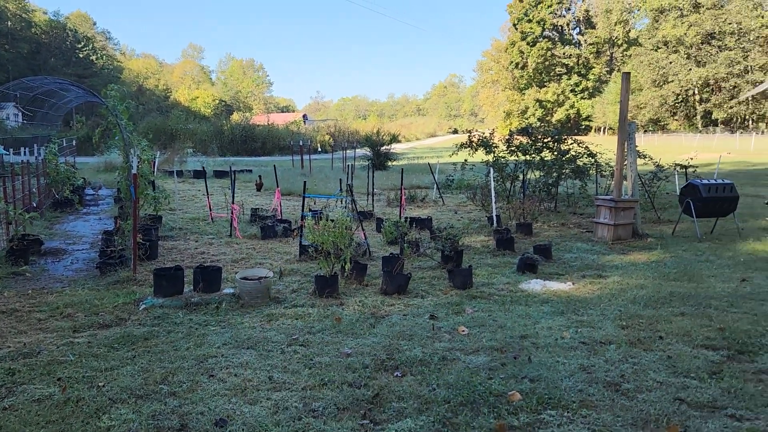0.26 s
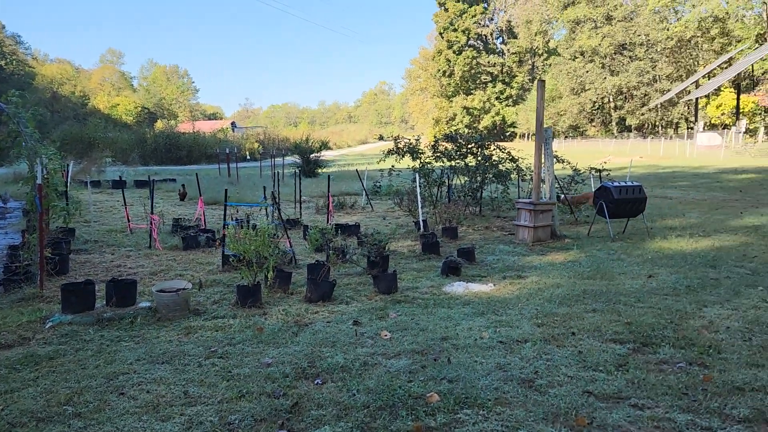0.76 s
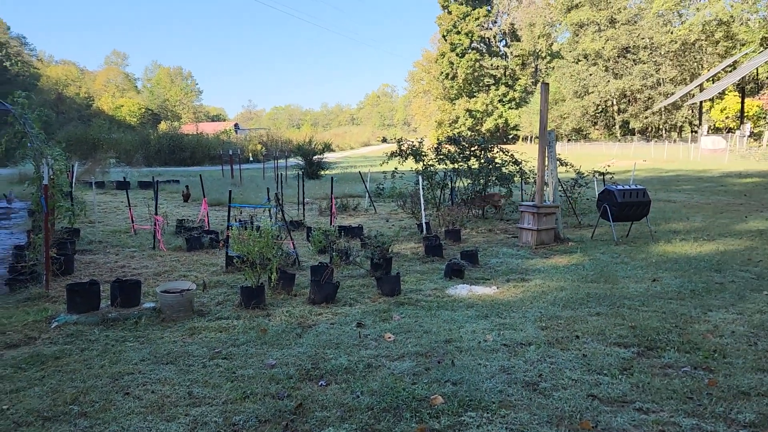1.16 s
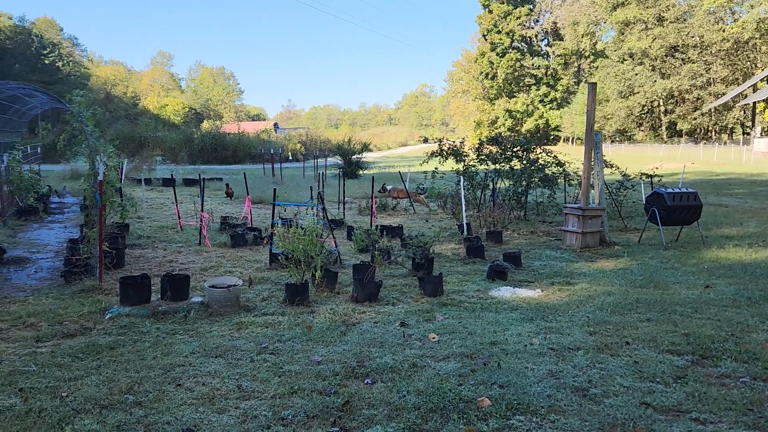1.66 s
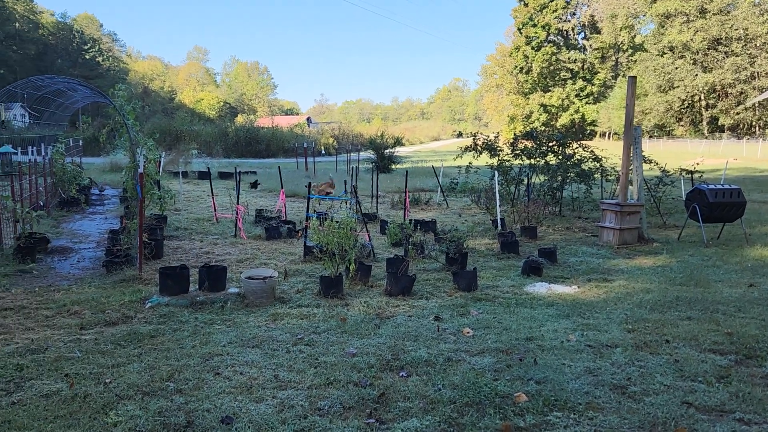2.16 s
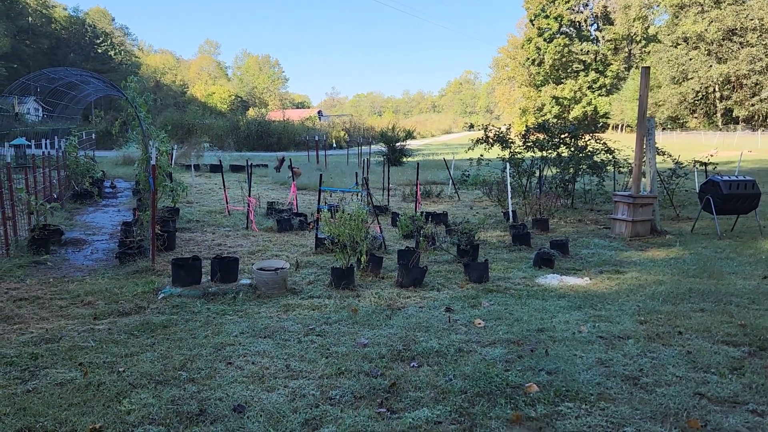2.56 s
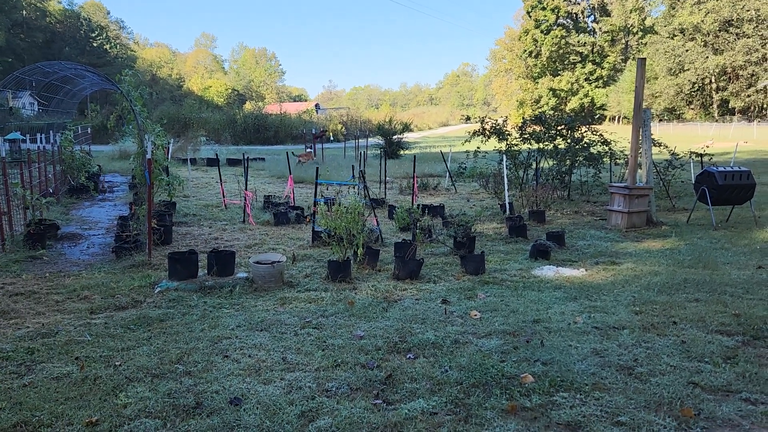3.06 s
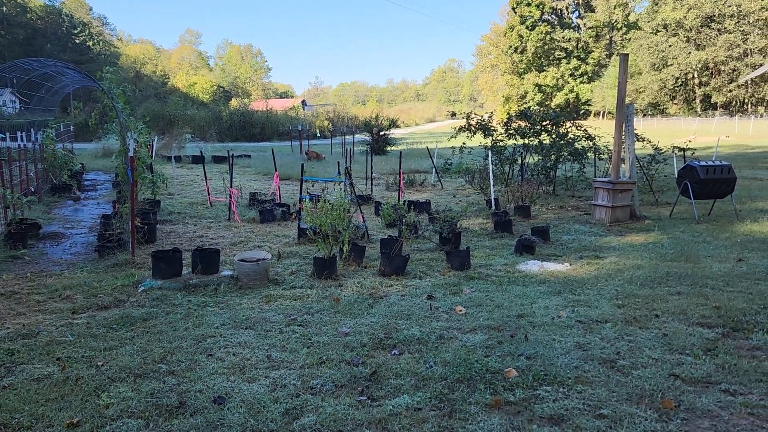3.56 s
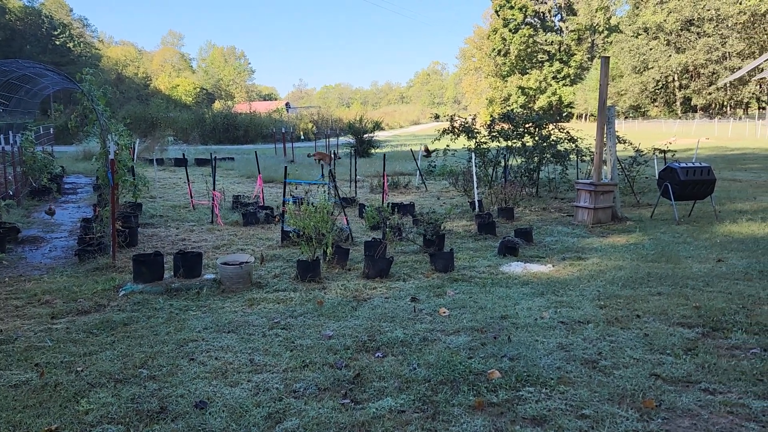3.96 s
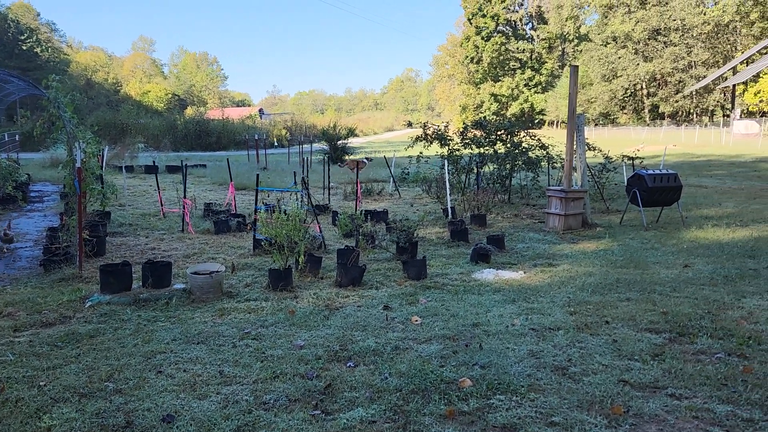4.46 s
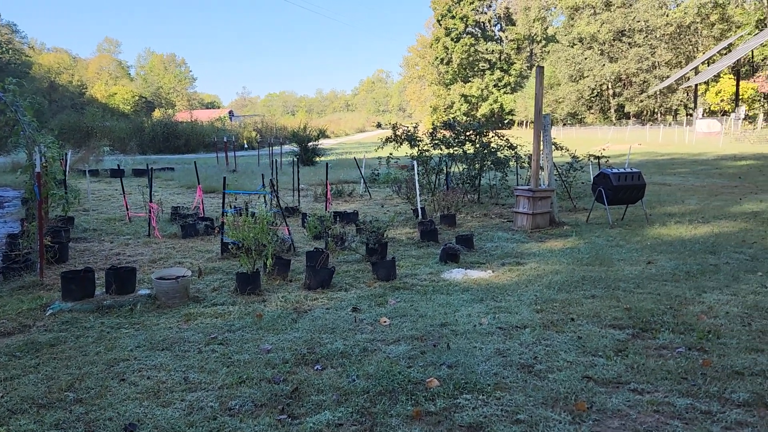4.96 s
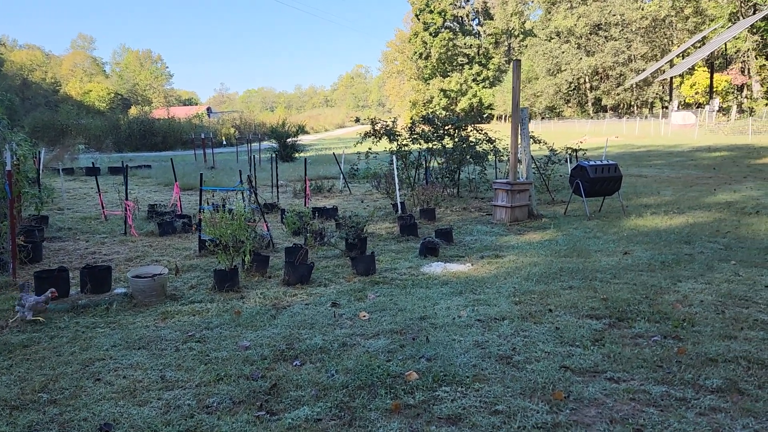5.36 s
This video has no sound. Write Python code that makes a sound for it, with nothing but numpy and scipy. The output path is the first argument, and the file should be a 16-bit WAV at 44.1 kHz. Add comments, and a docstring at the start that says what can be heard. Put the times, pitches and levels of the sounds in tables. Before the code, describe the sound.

A hen clucks, flaps and bursts into a fast run of hoarse, sharp cackles in a quiet garden yard, after a brief cloth rustle.

```python
"""Hen cackling in a garden yard

A hen clucks, flaps and cackles in a fast run of short hoarse notes: harmonics split by a second vibration, plus
breath noise; a second hen joins. Wings are low pushes of air and feather hiss; a thin metal part clinks in decaying
modes amid ticks and taps. Before that a sleeve brushes close by as shaped noise. Far away: fowl and songbirds as
gliding tones, chatter as noise in bands, a throbbing motor. Decaying noise tails give the yard's echoes.
"""
import sys
import numpy as np
from scipy import signal
from scipy.fft import rfft, irfft, next_fast_len
from scipy.io import wavfile
from scipy.ndimage import uniform_filter1d, map_coordinates

SR = 44100
rng = np.random.default_rng(int(sys.argv[2]) if len(sys.argv) > 2 else 0)


def generate_wav(sig):
    """Save sig (samples, or channels by samples) to the path in sys.argv[1] as 16-bit PCM at SR."""
    pcm = np.round(np.clip(np.atleast_2d(sig).T, -1, 1) * 32767).astype(np.int16)
    wavfile.write(sys.argv[1], SR, pcm)


N = 247520
TIME_S = np.arange(N) / SR

# cackle notes: (centre [s], half-length [s], level [dB], pitch at start [Hz], in middle [Hz],
#                roughness in middle [0-1, clipped], 3rd harmonic [dB], higher harmonics [dB])
CACKLE_NOTES = [(2.385, 0.034, -42, 499, 537, 0.07, -21, -3),
                (2.645, 0.028, -34.5, 740, 797, 0.3, 10.5, -2.5),
                (2.753, .049, -31.5, 667, 690, 0.7, 2.5, -0.5),
                (2.891, 0.043, -29.5, 698.4, 797, 0.45, -13, -13),
                (3.008, 0.048, -28.5, 691, 805, 0.47, -19, -6.5),
                (3.157, .043, -29, 658.8, 830, 0.22, -26, -4),
                (3.306, 0.046, -31.5, 642, 675, 0.8, -30, -5), (3.416, 0.02, -41, 670, 790, 0.36, -18, -13),
                (3.462, 0.04, -28, 654.8, 710, 0.36, -15, -6), (3.51, .028, -44.5, 595, 660, 0.9, -6, -22),
                (3.617, .041, -28, 667, 738, 0.45, -31, -6.5),
                (3.78, 0.038, -27.5, 679.5, 696, 0, -6.5, -7.5),
                (3.932, .04, -29.5, 656.7, 580, 0.25, -0.5, -5),
                (4.088, 0.034, -29.5, 673, 696, 0.22, -0.5, 0),
                (4.265, 0.046, -31.5, 669.4, 777, 1.08, 0, 2), (4.417, .04, -35, 656.5, 760, 0.9, -17, 4.5),
                (4.502, .031, -32.5, 654, 668, 0.01, -1.5, 8), (4.709, 0.044, -32, 660, 754, 0.74, -2, 3),
                (4.859, 0.035, -37.5, 608.5, 565, 0.1, -6.5, -3.5),
                (4.92, 0.05, -31, 656, 750, 0.75, -2, -0.5),
                (5.132, 0.052, -35, 615, 695, 0.86, -2.5, -4.5),
                (5.305, 0.053, -39, 599, 750, 0.73, -9, -4),
                (5.386, 0.05, -36, 624.7, 590, 0.4, -5.5, -1.5), (5.56, 0.068, -46, 615, 570, 0.95, -5, 0)]
# shut-beak clucks: (centre [s], half-length [s], level [dB], pitch at start, middle, end [Hz], roughness [0-1])
OPENING_CLUCKS = [(2.127, 0.034, -60.5, 622, 770, 730, 0.25), (2.234, 0.037, -56, 742, 690, 680, .1),
                  (2.354, .034, -47, 559, 650, 980, 0.15), (2.544, 0.028, -48.5, 598, 670, 580, 0.88)]
# second hen, further left, drawn-out notes:
# (centre [s], half-length [s], level [dB], pitch [Hz], roughness [0-1], 3rd harmonic [dB])
SECOND_HEN = [(4.609, .087, -50, 666, 0.22, -1), (5.026, 0.074, -48.5, 721, 0.58, -4),
              (5.467, 0.075, -45.5, 776, 0.72, -19)]
# near hen moves off: (time [s], lead of left over right [us])
LEFT_LEAD = [(2.1, 44), (3, 63), (3.8, -43), (4.3, -110), (5.6, -140)]
# breath spectrum: (frequency [Hz], relative density [dB])
BREATH_SPECTRUM = [(2650, 27), (4500, 1.5), (5390, -13), (5890, -8.5), (7550, -8.5), (8910, -19),
                   (10200, -22.5), (15500, -62)]
# windpipe response: (frequency [Hz], gain [dB])
WINDPIPE = [(300, -44), (480, -2), (650, 2.5), (1000, -4.5), (1200, 1.5), (1750, 0), (1950, -2.5),
            (2300, 0)]
# beak direction: (frequency [Hz], left-right difference [dB])
BEAK_SIDE_DB = [(800, -2.5), (1200, -1), (1600, -1.5), (2500, 5), (3400, -2.5), (4600, -2.5), (7500, -1.5),
                (15000, -2)]
SAG, EDGE_ROUGH = 0.96, 0.33  # end/start pitch ratio; roughness towards the ends of a cackle note
OPEN_LOW_DB, SHUT_LOW_DB = -18.5, 11  # fundamental, beak open and shut
SHUT_UPPER_DB, OTHER_UPPER_DB = 0.5, 4.5  # harmonics above the 3rd: opening clucks, second hen
BREATH_DB, BREATH_YIELDS = -20, 0.2  # level; dB lost per dB of 3rd harmonic
SIZZLE_DB, SIZZLE_FADE_DB_PER_S = -26, 2  # top of the breath, lost as the hen moves off
HEN_SIDE_DB, OTHER_SIDE_DB = 3, 9.5  # left-right


def hen():
    """Near and second hen: syrinx tones plus breath, less breathy with a fuller 3rd harmonic, through the windpipe."""
    calls = []
    for s, half_s, db, hz, mid_hz, rough, third_db, high_db in CACKLE_NOTES:
        pitch_hz = [hz, mid_hz, SAG * hz]
        roughness = [EDGE_ROUGH, rough, EDGE_ROUGH]
        calls.append((s, half_s, db, pitch_hz, roughness, OPEN_LOW_DB, third_db, high_db, HEN_SIDE_DB))
    for s, half_s, db, *pitch_hz, rough in OPENING_CLUCKS:
        calls.append((s, half_s, db, pitch_hz, [rough] * 3, SHUT_LOW_DB, 0, SHUT_UPPER_DB, HEN_SIDE_DB))
    for s, half_s, db, hz, rough, third_db in SECOND_HEN:
        calls.append((s, half_s, db, [hz] * 3, [rough] * 3, OPEN_LOW_DB, third_db, OTHER_UPPER_DB,
                      OTHER_SIDE_DB))

    voice, breath = np.zeros((2, N)), np.zeros((2, N))
    for s, half_s, db, pitch_hz, rough, low_db, third_db, high_db, side_db in calls:
        lead_s = np.interp(s, *np.transpose(LEFT_LEAD)) / 1e6
        tones, air = note(half_s, pitch_hz, rough, low_db, third_db, high_db, lead_s)
        add(voice, s - half_s, amp(db) * tones, side_db)
        add(breath, s - half_s, amp(db + BREATH_DB - BREATH_YIELDS * third_db) * air, side_db)

    hiss = filtered(breath, lambda hz: amp(along(BREATH_SPECTRUM, hz) + 6) * high_pass(hz, 4200, 8))
    near = amp(SIZZLE_DB - SIZZLE_FADE_DB_PER_S * (TIME_S - LEFT_LEAD[0][0]))
    hiss += filtered(near * breath, lambda hz: high_pass(hz, 11000, 8))
    return filtered(voice + hiss, lambda hz: amp(along(WINDPIPE, hz)) * lean(along(BEAK_SIDE_DB, hz)))


# throat response: (frequency [Hz], gain [dB])
THROAT_GAIN = [(500, -5), (1000, 3.5), (1330, 6), (2100, -1.5), (2700, 0.5), (3500, -9.5), (4200, -13),
               (5500, -36), (9000, -38)]


def note(half_s, pitch_hz, rough, low_db, third_db, high_db, lead_s):
    """Syrinx harmonics, split by a second vibration where rough; air escapes once a cycle. Gives voice, breath."""
    k = np.arange(1, 13)[:, None]
    u = np.arange(-half_s * SR, half_s * SR) / (half_s * SR)  # -1 to 1 over the note
    size = len(u)
    start_hz, mid_hz, end_hz = pitch_hz
    hz = np.interp(u, [-0.7335, -.33, 0.0026, 0.334, 0.736],
                   [.87 * start_hz, start_hz, mid_hz, end_hz, .87 * end_hz])
    hz = uniform_filter1d(hz, 120)
    share = np.interp(u, [-0.62, -0.22, -0.114, 0.57, 0.26], [.45, *rough, .45])
    share = np.clip(share, 0, 1)
    cycle = np.cumsum(hz * (1 + .045 * share * wobble(300, size))) / SR

    beat = np.cos(np.pi * .85 * cycle + 1.3 * wobble(110, size))  # slower, unsteady vibration
    slips = np.array([wobble(330, size) + 1j * wobble(330, size) for _ in k])
    blur = np.sqrt(1 - .36 * share) + np.sqrt(.18 * share) * slips
    phase = 2 * np.pi * (k * cycle + rng.random(k.shape))
    phase = phase + 1.8 * share * beat  # sidebands between harmonics
    tones = blur * np.exp(1j * phase)

    gain_db = along(THROAT_GAIN, k * hz) + low_db * (k == 1) + third_db * (k == 3) + high_db * (k > 3)
    gain_db -= 22 * u ** 2 * (k > 2)  # less effort at the ends: duller
    ears = []
    for shift_s in (lead_s, -lead_s):
        shifted = tones * np.exp(1j * np.pi * k * hz * shift_s)
        ears.append((amp(gain_db) * shifted).real.sum(0))
    low = np.real(amp(gain_db[0]) * tones[0])
    # the windpipe lets few of the lowest sidebands out
    edge = high_pass(np.fft.rfftfreq(size, 1 / SR), 1.22 * np.mean(pitch_hz), 5)
    ears = low + irfft(rfft(ears - low) * edge, size)

    swell = amp(-36 * np.abs(u) ** 2.63) * signal.windows.tukey(size, .3)
    noise = rng.standard_normal(size) + 1.93 * rng.standard_normal((2, size))
    puffs = (1 + np.cos(2 * np.pi * cycle)) * amp(3.0 * wobble(158, size))
    return swell * unit(ears), swell * puffs * noise


# wing beats: (time [s], level [dB])
WING_BEATS = [(2.636, -43), (2.7, -38.5), (2.781, -33.5), (2.88, -34), (2.954, -37), (3.058, -43),
              (3.15, -50), (3.229, -57), (3.308, -41.5), (3.569, -42.5), (3.627, -36), (3.719, -41.5)]
# feather sweeps: (start [s], length [s], level [dB])
FEATHER_SWISHES = [(2.13, .06, -69), (2.39, 0.095, -58), (2.545, .11, -51.5), (3.688, 0.17, -49)]
# stir of wings: (time [s], low air level [dB], feather hiss level [dB])
WING_STIR = [(2.2, -55, -74.5), (2.41, -65.5, -64), (2.58, -57, -58.5), (2.9, -50.5, -58), (3.3, -56, -59),
             (3.55, -51.5, -55.5), (3.66, -54, -52.5), (3.79, -61, -48), (4.0, -59.5, -56.5),
             (4.56, -53.5, -59), (5.28, -59.5, -59), (5.61, -59.5, -63.5)]
# low air spectrum: (frequency [Hz], relative density [dB])
AIR_SPECTRUM = [(12, -52), (20, -1), (43, -2.5), (94, 4.5), (179, -9), (350, -31.5), (460, -42),
                (770, -120)]
# feather hiss spectrum: (frequency [Hz], relative density [dB])
FEATHER_SPECTRUM = [(1470, -28), (2500, 0.5), (4600, -2.5), (6640, -12.5), (7800, -6.5), (8420, -14.5),
                    (9800, -19), (10800, -23), (15500, -30)]


def wings():
    """Each beat is a low push of air; feathers add short sweeps and an irregular hiss."""
    out, t = np.zeros((2, N)), np.arange(SR // 12) / SR
    for s, db in WING_BEATS:
        push = np.sin(2 * np.pi * 42 * t ** 0.83 * rng.uniform(0.52, 1.1))
        push += 0.67 * wobble(500, len(t))
        add(out, s, amp(db) * push * (t / 0.014) * np.exp(1 - t / 0.0073), 0)
    for s, length_s, db in FEATHER_SWISHES:
        u = np.linspace(0, 1, round(length_s * SR))
        swell = np.sin(np.pi * u ** 0.56) ** 2
        add(out, s, amp(db) * swell * bright_noise(len(u), 2), 3)
    air_db, hiss_db = curves(WING_STIR)
    begun = np.clip((TIME_S - WING_STIR[0][0]) / 0.073, 0, 1)
    air = amp(air_db + 3.6 * wobble(12)) * rush(AIR_SPECTRUM, patchy_db=2.0)
    hiss = amp(hiss_db + 2.5 * wobble(25)) * rush(FEATHER_SPECTRUM, patchy_db=1.5)
    return out + begun * (air + hiss)


# dry ticks: (time [s], level [dB], left-right difference [dB])
DRY_TICKS = [(1.257, -61, 12), (1.4681, -63, 20), (2.291, -54, 4.5), (2.665, -41.5, 1.5),
             (2.6844, -46, 2.0), (2.7756, -43, 8), (3.5645, -35.5, 1), (4.2532, -35, 4),
             (4.3308, -40.5, 5.5), (4.986, -48, -3)]
# dull taps: (time [s], level [dB], frequency [Hz], t60 [s])
DULL_TAPS = [(0.233, -31.5, 1580, 0.013), (0.3, -40, 900, 0.016), (0.37, -36, 700, 0.017),
             (0.389, -41, 1210, .015), (4.565, -44.5, 556, 0.071), (4.9, -42.5, 450, 0.038),
             (5.07, -41.5, 528, 0.073)]
# metal clinks: (time [s], level [dB], gain of modes above 9 kHz [dB])
METAL_CLINKS = [(3.5839, -40.5, 5), (3.691, -42, 2), (3.7044, -44, 2), (3.7402, -41.5, -16),
                (3.773, -41.5, -16)]
# modes of the thin metal part: (frequency [Hz], level [dB], t60 [s])
METAL_MODES = [(2650, -8, .05), (7757, 0, .07), (7968, -5, .07), (10370, -20, .05), (12820, -14, .02),
               (14400, -18, .03), (15300, -8, .07)]


def contacts():
    """Dry noise ticks, dull damped taps, and a thin metal part with new mode strengths at every blow."""
    out, t = np.zeros((2, N)), np.arange(SR // 6) / SR
    for s, db, side_db in DRY_TICKS:
        add(out, s, amp(db - 60 * t / .035) * bright_noise(len(t), 3), side_db)
    for s, db, hz, t60_s in DULL_TAPS:
        attack = 1 - np.exp(-t / (0.061 * t60_s))
        thud = np.sin(2 * np.pi * hz * t) + .5 * wobble(2 * hz, len(t))
        add(out, s, amp(db - 60 * t / t60_s) * attack * thud, 2.5)
    for s, db, top_db in METAL_CLINKS:
        ring = np.zeros(len(t))
        for hz, mode_db, t60_s in METAL_MODES:
            strength_db = mode_db + top_db * (hz > 9e3) + rng.normal(0, 2.7)
            ring += amp(strength_db - 60 * t / t60_s) * np.sin(2 * np.pi * hz * t)
        rattle = .4 * amp(-60 * t / .07) * rng.standard_normal((2, len(t)))
        add(out, s, amp(db) * (ring + rattle), 3.5)
    return out


# sleeve stroke: (time [s], level [dB])
SLEEVE_LEVEL = [(0.0, -89), (0.052, -64.5), (0.186, -52), (0.384, -45.5), (0.526, -51.5), (0.696, -67.5),
                (0.85, -80)]
# cloth hiss spectrum: (frequency [Hz], relative density [dB])
CLOTH_SPECTRUM = [(590, -29), (1000, -7), (1110, -7), (1400, -7.5), (1740, -1.5), (2090, 0.5), (2660, -5),
                  (4110, -2), (5740, -5), (7480, 0), (10700, -8.5), (12800, -6.5), (15600, -16.5)]
# low part under the hiss: (frequency [Hz], relative density [dB])
FOLD_SPECTRUM = [(120, -38), (200, 2), (225, -4.5), (367, 3.5), (1500, 6), (1950, -26), (3300, -120)]
FOLD_DB = -9


def sleeve():
    """Cloth sliding on cloth: a swelling, slightly grainy hiss with a low part under it."""
    ended = np.clip((SLEEVE_LEVEL[-1][0] + 0.14 - TIME_S) / .1, 0, 1)
    both = rush(CLOTH_SPECTRUM, patchy_db=1.7) + amp(FOLD_DB) * rush(FOLD_SPECTRUM, patchy_db=1.0)
    return ended * amp(curves(SLEEVE_LEVEL)[0] + 0.46 * wobble(60.3)) * both


# far fowl, arched notes: (start [s], length [s], start, top, end pitch [Hz], level [dB])
FAR_CALLS = [(0.04, 0.066, 1300, 1430, 1240, -65), (0.879, 0.1, 1174, 1418, 1110, -65.5),
             (1.216, 0.1, 1128, 1437, 1130, -66)]
# far soft clucks: (centre [s], half-length [s], level [dB], pitch [Hz], 3rd harmonic [dB])
FAR_CLUCKS = [(0.719, 0.019, -62.5, 630, -14), (1.116, 0.019, -69, 588, -15), (1.286, 0.02, -74, 645, 17),
              (1.577, 0.022, -71, 689, 9), (1.783, .025, -70.5, 636, 3), (1.952, 0.016, -68.5, 575, -2)]
# songbird whistles: (start [s], length [s], start pitch [Hz], end pitch [Hz], level [dB])
WHISTLES = [(.74, .04, 4600, 4000, -75), (1.36, .14, 4200, 3850, -77), (1.52, .2, 3230, 3500, -79),
            (1.51, .21, 4300, 4450, -83)]
# buzzy chirps: (start [s], level [dB], centre pitch [Hz], sweep [Hz], length [s])
BUZZY_CHIRPS = [(0.91, -63, 7370, 470, 0.11), (0.894, -68.5, 6240, 300, 0.12),
                (1.796, -58.5, 7860, 890, 0.024)]
# far chatter in the trees: (frequency [Hz], relative density [dB])
CHATTER_SPECTRUM = [(1060, -26), (1800, -5), (1960, -5), (2340, 1.5), (2790, -9), (3160, -5), (3640, -11),
                    (4000, -21), (5200, -51), (8800, -120)]
CHATTER_S, CHATTER_DB, CHATTER_RISE_S, CHATTER_FADE_DB_PER_S = 0.8, -67.5, 0.12, 27  # S: end of the rise


def birds():
    """Far fowl and songbirds as gliding tones and soft clucks in the yard's echoes; chatter as patchy noise."""
    fowl, song = np.zeros((2, N)), np.zeros((2, N))
    for s, length_s, start_hz, top_hz, end_hz, db in FAR_CALLS:
        u = np.linspace(0, 1, round(length_s * SR))
        arch = np.sin(np.pi * u ** 0.785)
        base_hz = start_hz + (end_hz - start_hz) * u
        add(fowl, s, glide(top_hz * arch + (1 - arch) * base_hz, db, waver=0.0087), 4.5)
    for s, half_s, db, hz, third_db in FAR_CLUCKS:
        tones, _ = note(half_s, [hz] * 3, [.3] * 3, -11, third_db, -9.0, 0)
        add(fowl, s - half_s, amp(db) * tones, 4.5)
    for s, length_s, start_hz, end_hz, db in WHISTLES:
        u = np.linspace(0, 1, round(length_s * SR))
        swell_db = db - 14 * np.abs(u - .3) + 2.3 * wobble(36, len(u))
        add(song, s, glide(start_hz + (end_hz - start_hz) * u, swell_db, waver=0.02), 4.5)
    for s, db, hz, sweep_hz, length_s in BUZZY_CHIRPS:
        t = np.arange(length_s * SR) / SR
        buzz_hz = hz + sweep_hz * np.tanh(wobble(512, len(t)))
        add(song, s, glide(buzz_hz, db - 8 * t / length_s, waver=0.021), 5.5)
    t = TIME_S - CHATTER_S
    rise = np.clip(1 + t / CHATTER_RISE_S, 0, 1)
    fade = amp(CHATTER_DB - CHATTER_FADE_DB_PER_S * np.maximum(t, 0))
    chatter = rise * fade * rush(CHATTER_SPECTRUM, patchy_db=3)
    return echoes(fowl, wet_db=-6.5) + echoes(song, wet_db=-5.5) + chatter


def glide(hz, db, waver):
    """A gliding, slightly unsteady sine."""
    phase = 2 * np.pi * np.cumsum(hz * (1 + waver * wobble(151.3, len(hz)))) / SR
    return np.sqrt(2) * amp(db) * signal.windows.tukey(len(hz), .3) * np.sin(phase)


# motor overtones: (frequency [Hz], level before throb [dB])
MOTOR_TONES = [(91.5, -60), (183.0, -75.5), (274.5, -82), (554.5, -74.5)]
# open-air hush: (frequency [Hz], relative density [dB])
HUSH_SPECTRUM = [(12, -18), (20, -18.5), (93, 1), (226, -23), (274, -16.5), (343, -20.5), (551, -16.5),
                 (708, -24), (1380, -26.5), (1590, -30.5), (2850, -40), (6220, -40.5), (7560, -29.5),
                 (10600, -48), (15600, -49)]
SHAFT_HZ, FIELD_DB = 15.3, -59.5


def field():
    """Open-air hush and a far motor's overtones, throbbing at its shaft rate with slight speed drift."""
    t = TIME_S + np.cumsum(0.012 * wobble(14)) / SR
    throb = amp(5 * np.sin(2 * np.pi * SHAFT_HZ * t) + 2 * wobble(3))
    drone = np.zeros(N)
    for hz, db in MOTOR_TONES:
        drone += amp(db + 1.3 * wobble(25)) * np.sin(2 * np.pi * hz * t + rng.uniform(0, 2 * np.pi))
    return throb * drone + amp(FIELD_DB) * rush(HUSH_SPECTRUM, patchy_db=3.0)


# stereo likeness: (frequency [Hz], left-right correlation [-1 to 1])
LIKENESS = [(60, 0.98), (150, 0.98), (380, 0.81), (950, 0.19), (2380, 0.095), (5980, -0.023),
            (15000, -0.12)]
# stereo balance: (frequency [Hz], left-right difference [dB])
BALANCE_DB = [(60, -0.5), (150, 0.5), (380, 2), (950, 2), (2380, 7.5), (5980, 3.5), (15000, 10)]


def rush(spectrum, patchy_db):
    """Stereo noise, rms 1 in the mono mean, with time-frequency patches of random gain."""
    z = signal.stft(rng.standard_normal((2, N)), nperseg=512)[2]
    patches = uniform_filter1d(rng.standard_normal(z.shape[1:]), 6, 0)
    patches = uniform_filter1d(patches, 10, 1)
    pair = signal.istft(z * amp(patchy_db * unit(patches)), nperseg=512)[1][:, :N]

    def mid_side_gain(hz):
        turn = np.arccos(np.clip(along(LIKENESS, hz), -1, 1)) / 2
        return amp(along(spectrum, hz)) * [np.cos(turn), np.sin(turn)]

    mid, side = filtered(pair, mid_side_gain)
    both = filtered(np.array([mid + side, mid - side]), lambda hz: lean(along(BALANCE_DB, hz)))
    return both / np.sqrt(np.mean(both.mean(0) ** 2))


# yard echoes: (frequency [Hz], t60 [s], colour [dB])
YARD_ECHO = [(300, 1, -3), (800, 1, -3), (1300, 1, -9), (1770, 1, -3.5), (4170, 1, -1.5), (11700, 0.12, -3)]


def echoes(x, wet_db):
    """Fences and sheds answer: noise tails decay by frequency, with a fresh random tail every 1/6 s."""
    hz, t60_s, colour_db = np.transpose(YARD_ECHO)
    wet, step = np.zeros((2, N)), SR // 6
    for start in range(0, N, step):
        f, t, z = signal.stft(rng.standard_normal((2, SR // 2)), SR, nperseg=256)
        fade_db = np.interp(f, hz, colour_db)[:, None] - 60 * t / np.interp(f, hz, t60_s)[:, None]
        tail = signal.istft(z * amp(fade_db), SR, nperseg=256)[1] / np.sqrt(SR / 50)
        tail *= amp(0.76 * wobble(35.0, tail.shape[1]))  # single walls stand out
        block = x.mean(0)[None, start:start + step]
        add(wet, start / SR + .016, signal.fftconvolve(block, tail, axes=1), 3)
    return x + amp(wet_db) * wet


def amp(db):
    """Decibels to amplitude."""
    return 10 ** (np.asarray(db) / 20)


def unit(x):
    """Scale to rms 1."""
    return x / np.sqrt(np.mean(np.abs(x) ** 2) + 1e-20)


def along(points, hz):
    """Interpolate (frequency [Hz], value) on a log axis."""
    f, v = np.transpose(points)
    return np.interp(np.log(hz + 1), np.log(f + 1), v)


def curves(rows):
    """One value per sample for each column after the time."""
    s, *cols = np.transpose(rows)
    return [np.interp(TIME_S, s, c) for c in cols]


def wobble(rate_hz, size=N):
    """Smooth random curve, rate_hz knots a second."""
    knots = rng.standard_normal(int(size * rate_hz / SR) + 4)
    return map_coordinates(knots, [np.arange(size) * rate_hz / SR])


def bright_noise(size, smooth):
    """Stereo noise, smoothed over a few samples, then differenced."""
    return np.diff(uniform_filter1d(rng.standard_normal((2, size + 1)), size=smooth))


def high_pass(hz, cut_hz, order):
    """Smooth high-pass gain, one half at the cut."""
    return 1 / (1 + (cut_hz / (hz + 1)) ** order)


def filtered(x, response):
    """Apply a response of frequency to x."""
    m = next_fast_len(N + SR // 2)
    return irfft(rfft(x, m) * response(np.fft.rfftfreq(m, 1 / SR)), m)[..., :N]


def lean(db):
    """Left and right gains for a level difference."""
    return amp([db / 2, -db / 2])


def add(track, s, sound, side_db):
    """Mix a sound into a stereo track from time s."""
    part = track[:, round(s * SR):][:, :sound.shape[-1]]
    part += lean(side_db)[:, None] * sound[..., :part.shape[1]]


def scene():
    """Hens and contacts with echoes, over wings, sleeve, birds and field."""
    return echoes(hen() + contacts(), wet_db=-11) + wings() + sleeve() + birds() + field()


TOP_HZ = 15830


def record(dry):
    """Band limit: nothing passes at or above TOP_HZ."""
    return filtered(dry, lambda hz: hz < TOP_HZ)


dry = scene()
out = record(dry)
generate_wav(out)
```